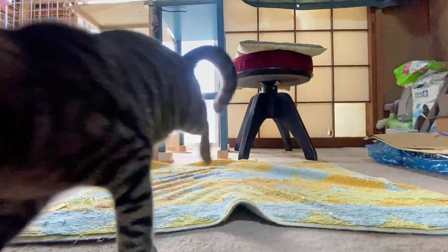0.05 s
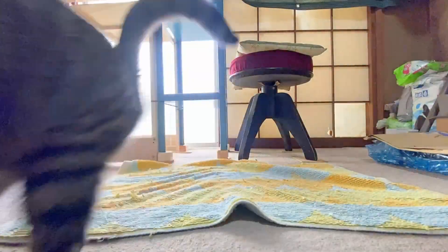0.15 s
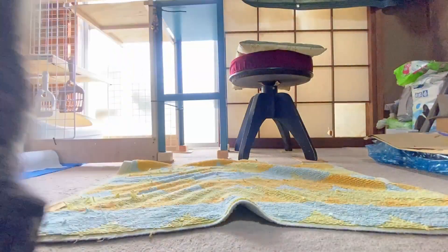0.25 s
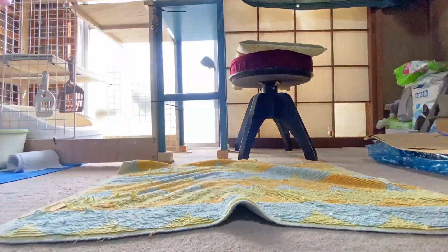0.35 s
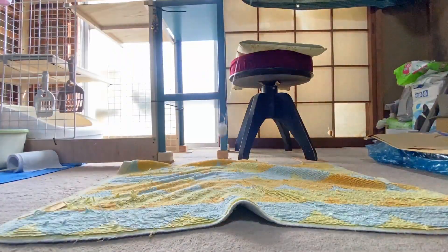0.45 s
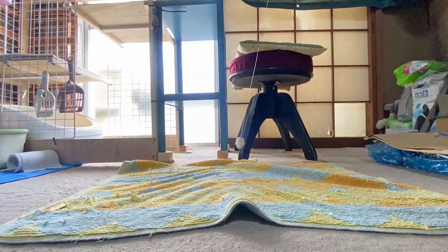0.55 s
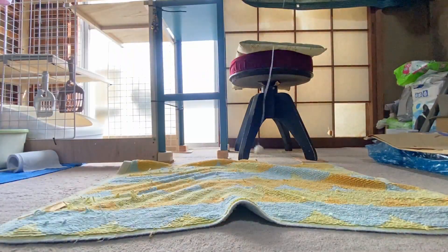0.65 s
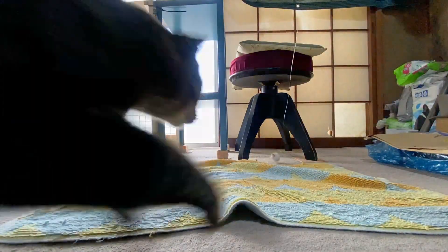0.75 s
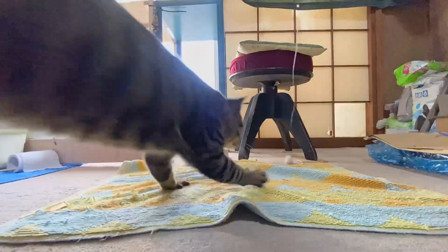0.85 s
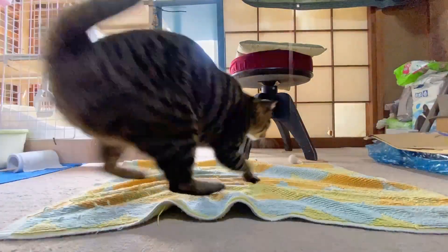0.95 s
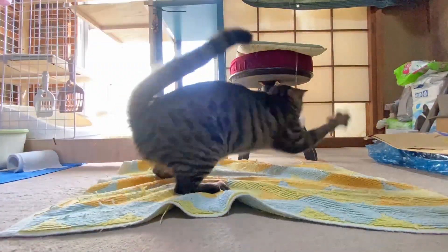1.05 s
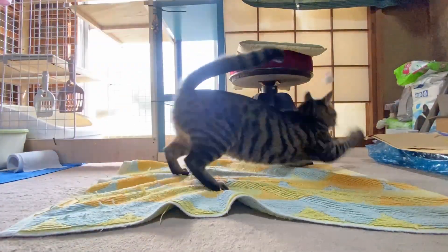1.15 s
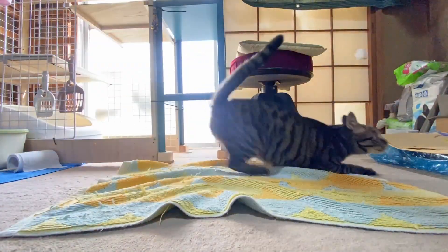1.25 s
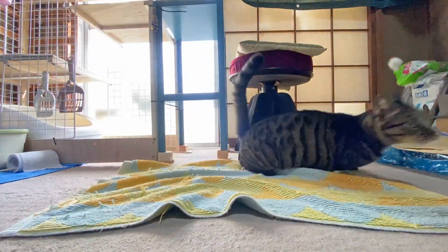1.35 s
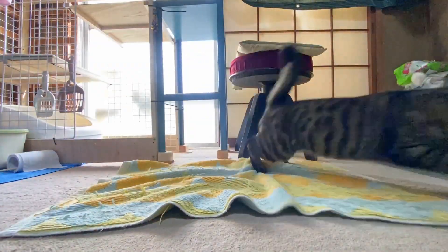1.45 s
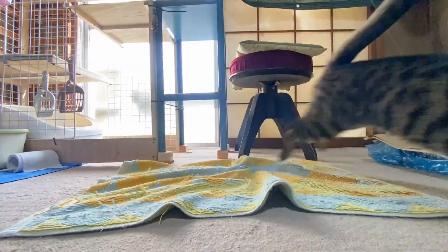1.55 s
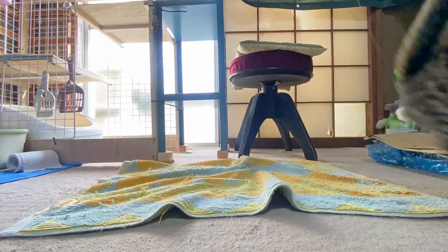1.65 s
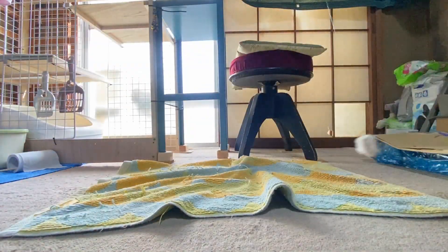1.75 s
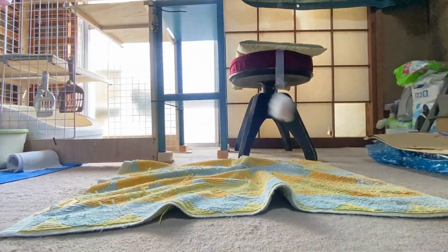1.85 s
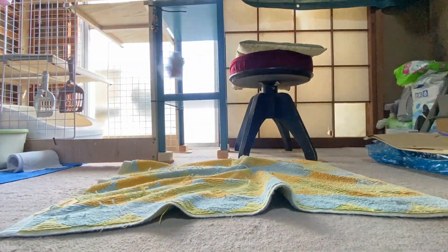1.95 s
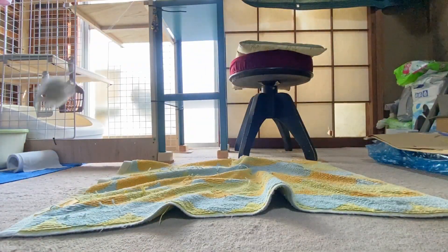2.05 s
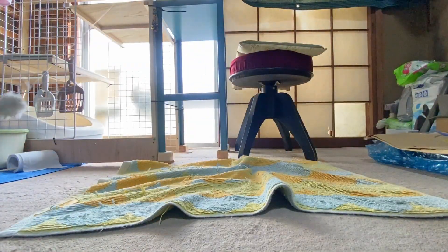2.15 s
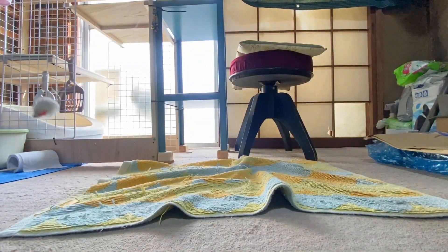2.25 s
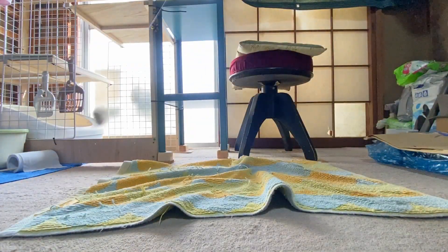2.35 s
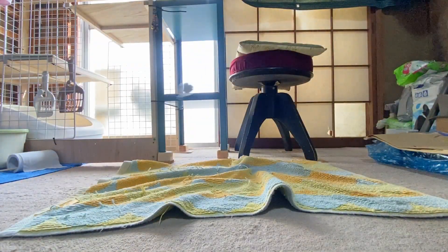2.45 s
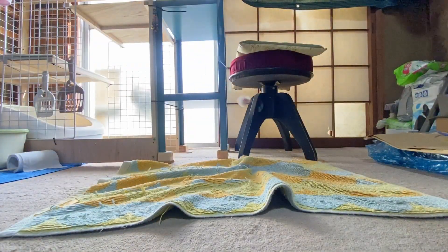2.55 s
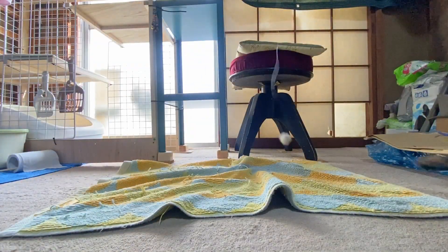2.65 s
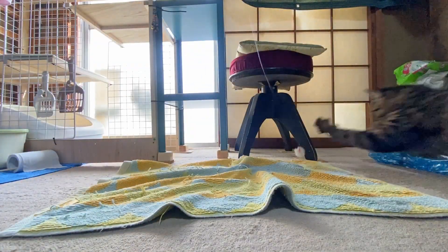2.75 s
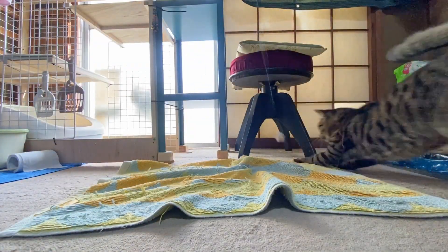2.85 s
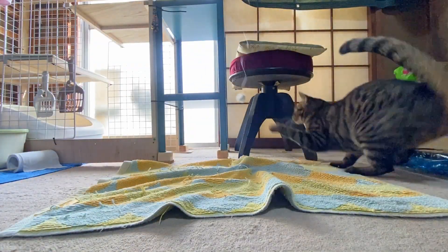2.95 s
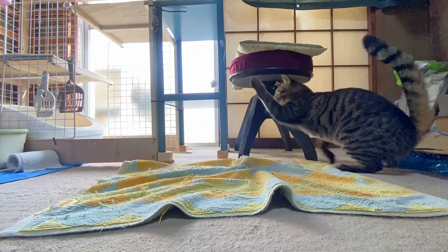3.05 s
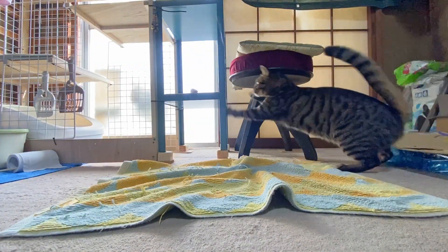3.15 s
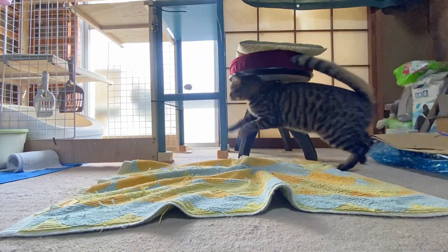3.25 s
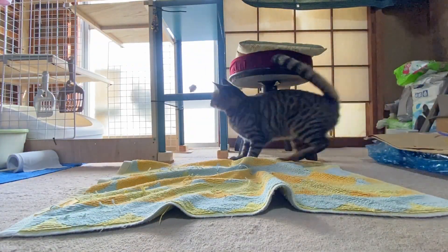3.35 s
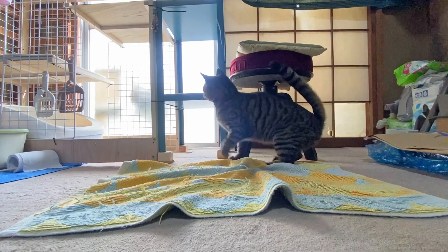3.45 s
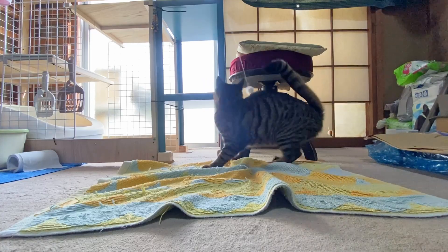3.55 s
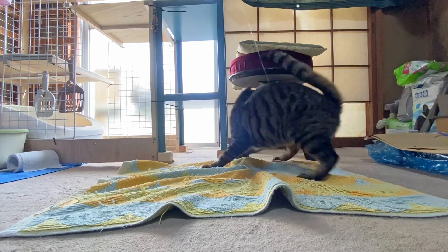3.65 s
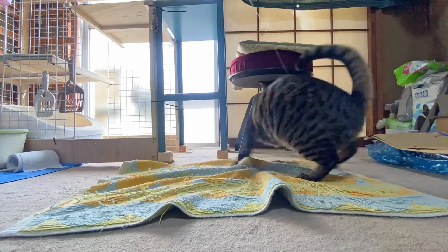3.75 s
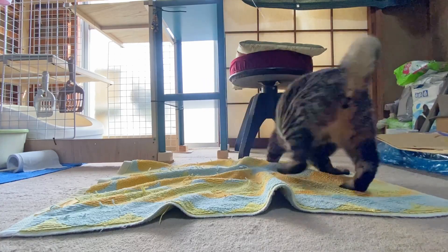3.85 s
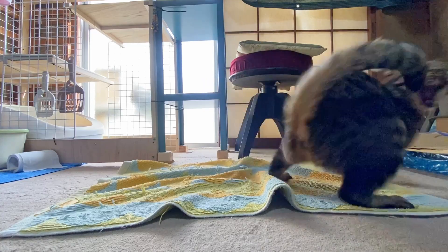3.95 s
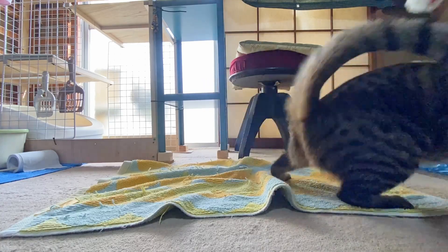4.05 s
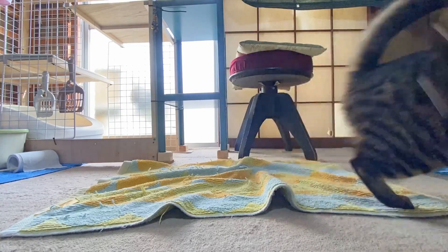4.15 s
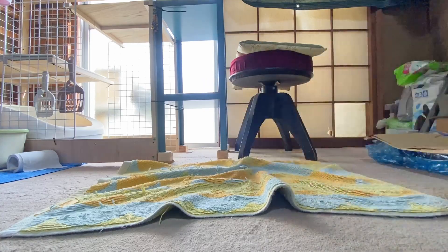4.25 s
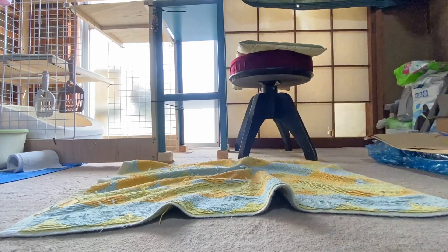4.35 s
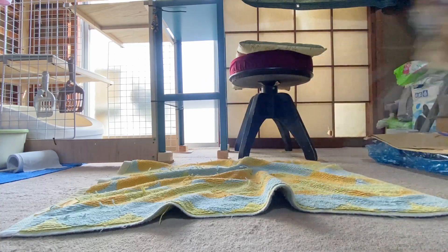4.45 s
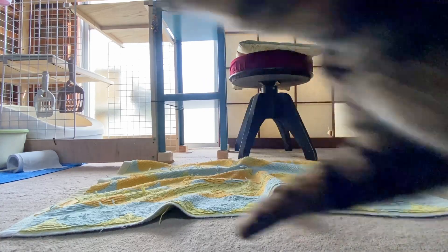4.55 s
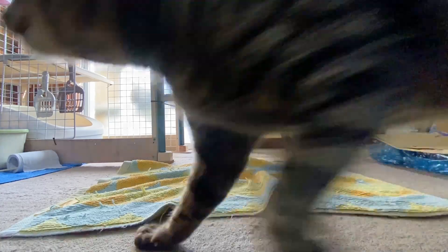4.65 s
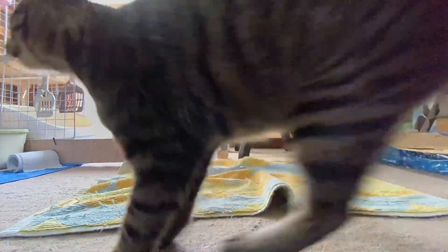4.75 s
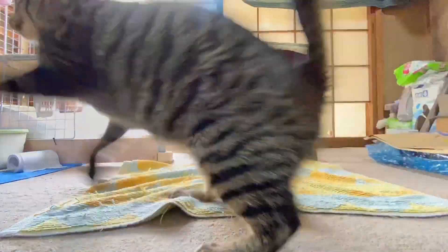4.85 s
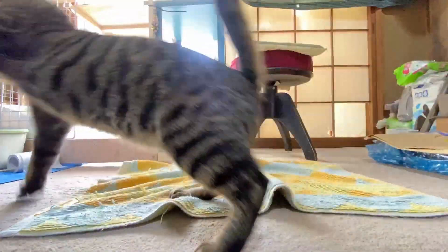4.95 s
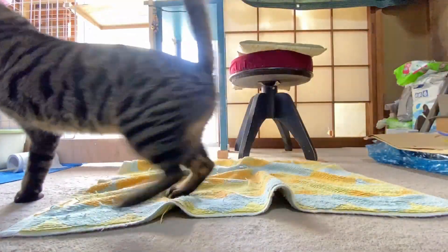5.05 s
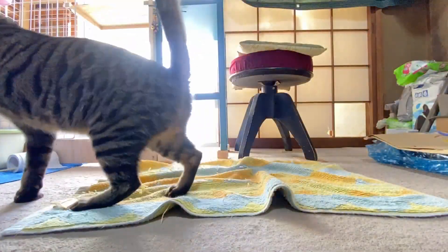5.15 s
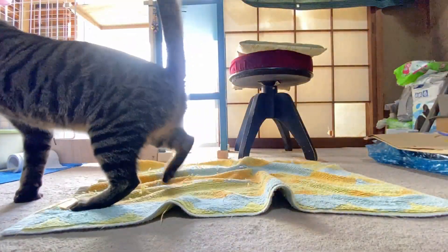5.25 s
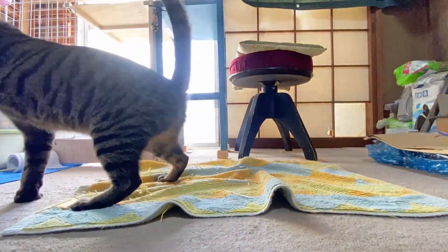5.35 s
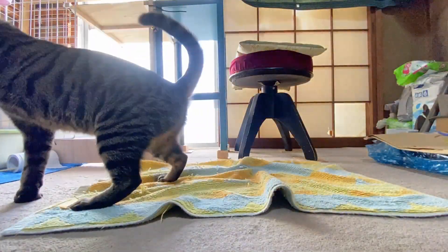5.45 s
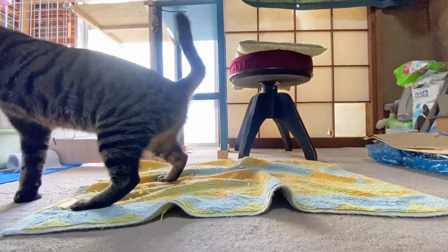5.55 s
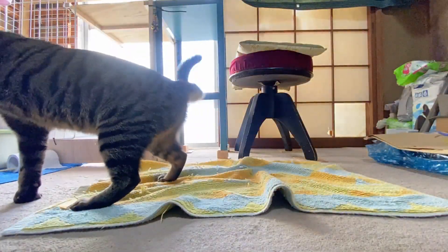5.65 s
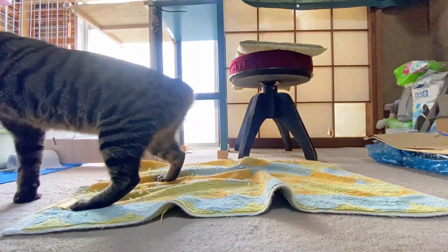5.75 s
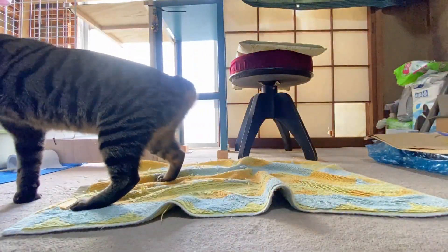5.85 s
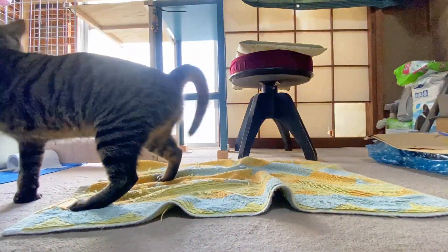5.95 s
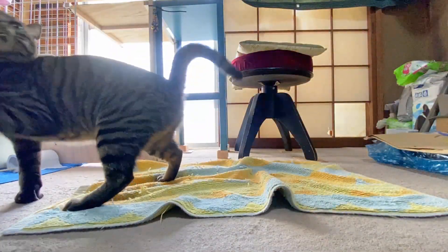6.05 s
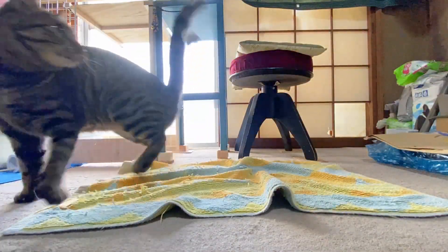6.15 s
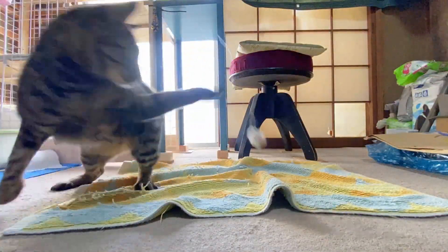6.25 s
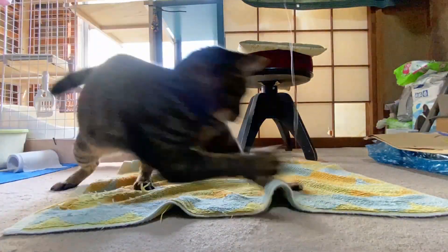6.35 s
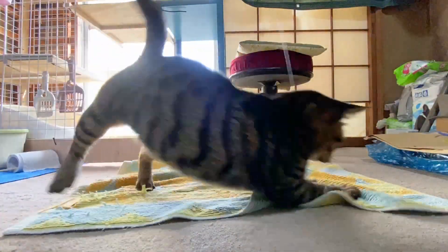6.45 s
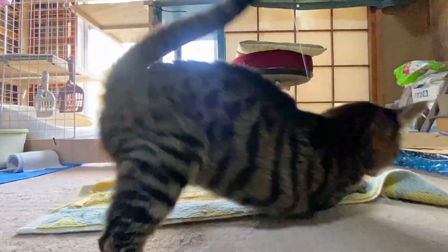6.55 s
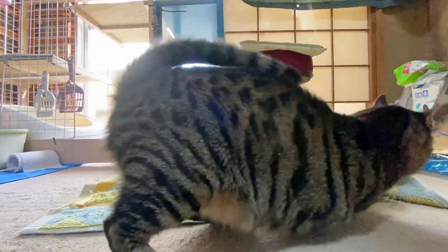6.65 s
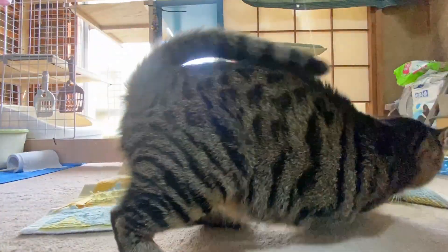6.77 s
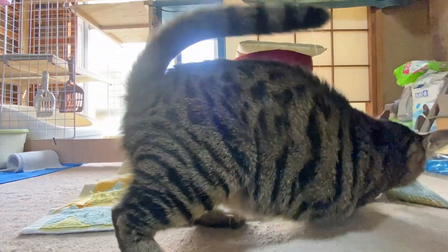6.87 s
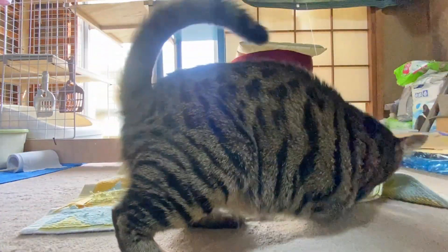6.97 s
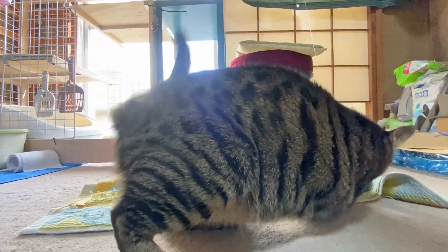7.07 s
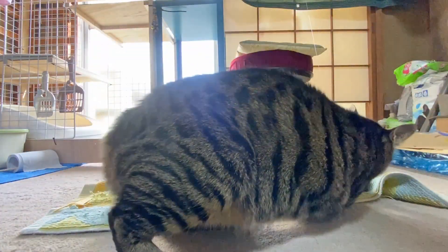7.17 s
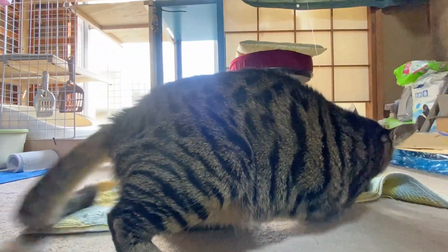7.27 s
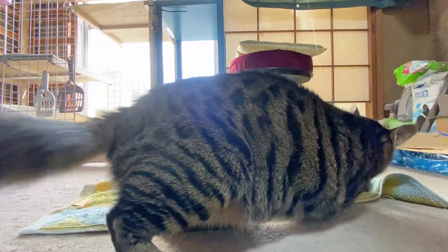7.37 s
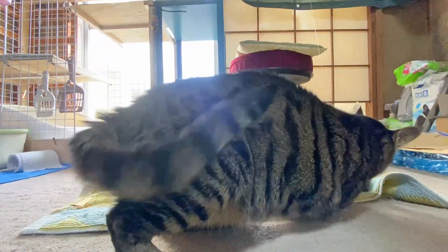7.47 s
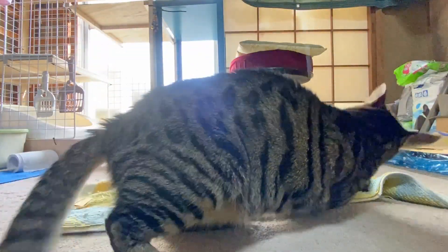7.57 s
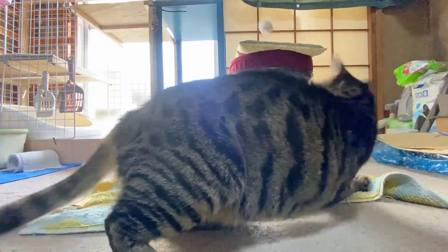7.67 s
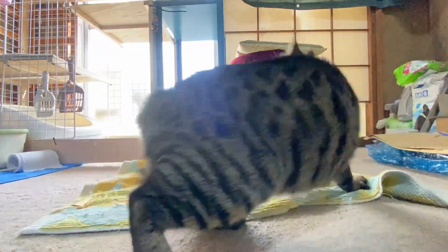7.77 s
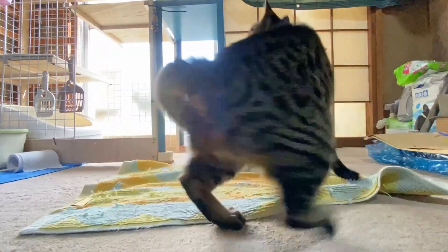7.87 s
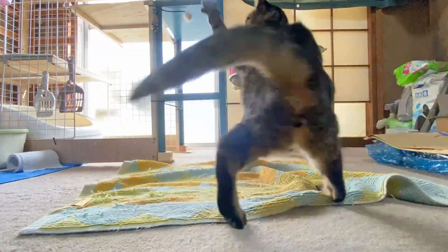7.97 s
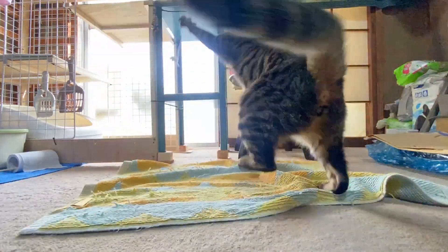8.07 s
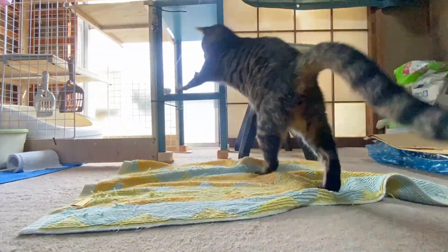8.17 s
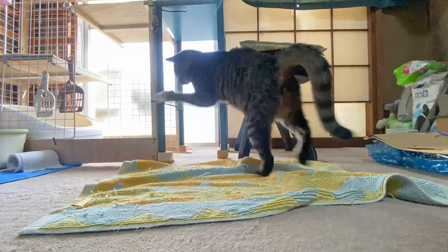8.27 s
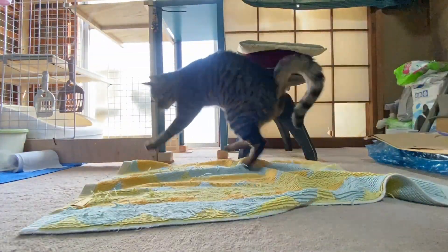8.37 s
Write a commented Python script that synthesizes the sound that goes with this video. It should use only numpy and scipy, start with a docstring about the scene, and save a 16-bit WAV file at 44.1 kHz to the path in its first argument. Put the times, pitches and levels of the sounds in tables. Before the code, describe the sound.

A microphone on the ground catches a cat bounding after a string toy. Soft paws pat the cloth while the wooden floor beneath answers with short, deep knocks. Terry cloth rustles and hisses, and claws pull free with tiny bright crackles. Bursts of running alternate with near-silent waits; a big double landing comes late, followed by stillness, a dull microphone rub, and a last flurry of scratchy swats.

```python
"""A carpeted wooden floor with a towel on it, microphone on the ground: a cat chases a toy on a string.
Paws: a soft chirped pat at each contact; under landings a knock and a hollow ring, spread into a falling chirp.
Towel: shaped noise for rub and hiss, short notes for flopping folds, bright dying crackle for snagged loops.
String: narrow-band air noise. Microphone: two brushes, each a low sway and a muffled rub.
Behind it: the room's reverberation, a low rumble and a faint hiss."""
import sys
import numpy as np
from scipy import signal
from scipy.fft import rfft, irfft, next_fast_len
from scipy.io import wavfile

SR = 44100
rng = np.random.default_rng(int(sys.argv[2]) if len(sys.argv) > 2 else 0)


def unload_audio(sound):
    """Save the sound as a 16-bit wav file, at the path given as the first command line argument."""
    columns = np.transpose(np.atleast_2d(sound))
    # keep every value between -1 and 1, then stretch to whole-number steps
    steps = np.round(np.clip(columns, -1, 1) * 32767)
    wavfile.write(sys.argv[1], SR, steps.astype(np.int16))


N = 370881
TIME_S = np.arange(N) / SR
AGE_S = np.arange(SR // 3) / SR   # since a contact

# Table levels are nominal: sources add their own trims. Pan > 0 is left.
# paws landing with weight: [t/s, thud level/dB, nominal board f/Hz, knock level/dB, pat level/dB,
# scuff level/dB, pan/dB]
FOOTFALLS = [(-.015, -25.5, 142.4, -48, -50, -70, -2), (0.031, -33, 140.5, -43, -50, -81, 4),
             (.173, -28.5, 139, -38, -29.5, -46, 5), (0.232, -37, 122, -48.5, -54, -78, 11),
             (0.266, -28.5, 156.7, -41.5, -36.5, -55, 3.5), (0.313, -35.5, 139, -50, -28, -49, 14),
             (0.446, -48.5, 142, -38.5, -30.5, -74, 5.5), (.492, -31.5, 143, -32, -27.5, -36.5, 5.5),
             (0.541, -37, 138, -43, -44, -58, 3.5), (0.678, -30.5, 147, -35.5, -23, -66, 9),
             (0.994, -32, 120.5, -52, -32, -78, -1), (1.163, -32, 184, -28, -26.5, -78, -1.5),
             (1.223, -33, 128, -33.5, -33.5, -79, -3.5), (1.288, -34, 123, -41, -28.5, -50.5, -3),
             (1.469, -39, 132, -62, -53, -72, -8), (1.566, -30.5, 137.5, -38, -39.5, -57.5, -8),
             (1.69, -38, 153, -51, -43.5, -62, -9), (1.742, -31, 127, -43.5, -46, -63, -11.5),
             (1.866, -51.5, 152, -52.5, -48.5, -76, -9), (2.589, -40, 122, -41.5, -26, -52.5, -5),
             (2.826, -29.5, 139, -27.5, -21, -65, -2.5), (2.849, -29, 147, -38, -35.5, -62, -1),
             (3.006, -42.5, 120, -46.5, -46, -84, -4.5), (3.332, -37.5, 158.5, -48, -37.5, -82, 0),
             (3.39, -44.5, 134, -45, -60, -81, -5), (3.555, -42, 171, -52.5, -42.5, -78, 3),
             (3.673, -41.5, 131, -43, -41.5, -83, 2.5), (3.804, -35, 141, -37, -36, -88, -1.5),
             (3.867, -45, 185, -45.5, -47, -85, -1.5), (3.965, -31, 119, -34, -31.5, -52.5, -2),
             (4.141, -26.5, 141, -31, -33, -54, -9), (4.234, -31, 124, -31.5, -24.5, -43, -7.5),
             (4.306, -41.5, 155, -48.5, -34.5, -50, -6), (4.455, -37, 149.3, -42.5, -41, -72, -10.5),
             (4.663, -44.5, 129, -61.5, -43.5, -73, 2), (4.756, -33.5, 147, -39, -24, -61, 6),
             (4.806, -29, 123, -51, -35, -56, -0.5), (4.868, -32, 128, -42, -39.5, -78, 1),
             (5.053, -41, 150, -37.5, -29.5, -52, 3.5), (5.35, -52, 135, -65.5, -59, -96, 1),
             (6.242, -35.5, 129, -42.5, -28, -84, 1.5), (6.326, -39.5, 140, -45.5, -38.5, -69, 0),
             (6.381, -30.5, 141, -43, -32, -57, -0.5), (6.435, -22.5, 131.6, -32.5, -27.5, -75, -3.5),
             (6.548, -20, 133.7, -30.5, -15, -36, 1.5), (6.623, -42, 132.3, -54, -34, -64, 2.5),
             (7.211, -48.5, 141, -59.5, -54.5, -91, 1.5), (7.602, -47, 150, -45.5, -45.5, -72, 6),
             (7.98, -32, 132.4, -48, -41, -72, -5.5), (8.234, -40, 147, -30.5, -25, -67, 1)]
# further floor modes: [f/Hz, level/dB relative to one another, t60/s]
FLOOR_MODES = [(65.4, -36.5, 0.39), (178, -19.5, 0.1), (261.4, -25, 0.35)]
# swipes that hit only the cloth: [t/s, pat level/dB, f/Hz, scuff level/dB, pan/dB]
SWATS = [(.508, -21, 714, -41, 3), (.519, -17, 667, -60, -2), (.648, -21.5, 750, -45.5, 4),
         (.67, -35, 860, -71, -0.5), (.71, -54, 895, -78, 1), (.979, -43, 970, -64, -3.5),
         (1.183, -29, 524, -83, -4), (1.343, -35, 700, -48.5, -2.5), (2.603, -36, 590, -45.5, 4.5),
         (2.684, -44, 740, -66.5, -4), (2.749, -52, 900, -67, -3), (2.824, -32, 840, -70, -0.5),
         (3.237, -42, 1190, -77, 1), (3.262, -48, 900, -80, 0.5), (4.397, -64, 840, -49, 2.5),
         (4.55, -58, 890, -70, 0), (5.066, -31.5, 664, -50, -3), (5.179, -47, 640, -60, 1),
         (5.51, -57, 754, -86, 2.5), (5.792, -37.5, 500, -50, 7), (5.83, -46, 626, -80.5, 1.5),
         (7.878, -34.5, 720, -57, -.5), (7.901, -25, 755, -71, -3), (8.018, -44, 676, -67, 2),
         (8.242, -31.5, 900, -67, 0), (8.349, -32, 361, -65, 2)]
# leg or flank strokes over the towel: [t/s at the fastest, rise/s, rub level/dB, hiss level/dB]
STROKES = [(.01, 0.013, -43, -56), (.09, 0.081, -56, -57.5), (.335, 0.062, -51, -57),
           (.495, 0.006, -39, -33), (.535, .04, -38, -44), (.66, 0.069, -50, -55), (.76, 0.02, -64, -62.5),
           (.915, 0.048, -46, -57.5), (1.03, 0.026, -47.5, -53), (1.24, 0.074, -50, -68.5),
           (1.33, 0.044, -37, -53), (1.485, 0.042, -44, -54.5), (1.62, 0.067, -62, -67.5),
           (1.78, 0.052, -56.5, -63.5), (2.2, 0.075, -75, -70.5), (2.545, .015, -47.5, -59),
           (2.605, 0.051, -54.5, -64), (2.77, 0.066, -55.5, -73.5), (2.995, 0.017, -49.5, -73),
           (3.06, 0.031, -45, -59), (3.18, 0.016, -48.5, -57), (3.26, 0.028, -51.5, -67),
           (3.35, 0.046, -48, -73), (3.405, 0.076, -57.5, -62.5), (3.82, 0.11, -58, -78),
           (3.98, .04, -53, -58), (4.07, 0.017, -84, -69), (4.255, 0.016, -57, -44.5),
           (4.32, 0.017, -50, -52.5), (4.385, 0.06, -46.5, -59.5), (4.59, 0.043, -68, -69),
           (4.775, 0.026, -41, -66), (5.075, 0.031, -40, -53), (5.17, 0.073, -56, -59.5),
           (5.67, 0.0095, -55, -62), (5.82, 0.032, -49, -62.5), (6.06, 0.38, -67.5, -71),
           (6.49, 0.049, -53, -49), (6.59, 0.05, -52, -54.5), (7.62, 0.02, -66, -66),
           (7.885, 0.033, -46, -57), (8.08, 0.28, -81, -63.5), (8.245, 0.029, -34.5, -50.5),
           (8.37, 0.071, -45.5, -61)]
# bearing of the cat: [t/s, pan/dB]
BEARING = [(0, 1), (.6, 7.5), (1.1, 1), (2.6, -2.5), (4.2, 3), (4.7, 2), (5.8, 5.5), (6.3, 1.5), (8.3, 0.5)]
# claws plucking towel loops: [t/s, level/dB, t60/s]
SNAGS = [(0.096, -54, 0.073), (0.484, -53, 0.25), (0.63, -58, 0.025), (1.01, -63, 0.037),
         (1.115, -65.5, 0.12), (2.829, -46, .26), (2.858, -62, 0.13), (3.021, -66, 0.2),
         (3.153, -45.5, 0.12), (3.36, -58, 0.48), (3.897, -58.5, 0.66), (4.754, -70, 0.046),
         (5.041, -45.5, .32), (5.178, -55.5, .17), (5.222, -64, 0.12), (5.658, -73, 0.079),
         (5.793, -59, 0.25), (6.782, -65.5, 0.18), (8.146, -53.5, 0.24), (8.202, -41.5, 0.065),
         (8.288, -53.5, 0.27), (8.385, -52.5, 0.26)]
# string whipping through the air: [t/s, half length/s, f/Hz, level/dB]
SWISHES = [(2.206, 0.061, 6900, -75), (3.933, 0.021, 4300, -66), (4.066, 0.018, 7450, -63)]
# cat brushing the microphone: [t/s, half length/s, air push level/dB, muffled rub level/dB]
BRUSHES = [(0.275, 0.015, -37, -34), (7.473, 0.024, -23.5, -21.5)]

# spectrum of the coarse rub: [f/Hz, relative density/dB]
RUB_SPECTRUM = [(150, 16.5), (350, 9), (700, -0.5), (1300, 3), (2300, -5.5), (3500, -18.5), (6000, -33)]
# spectrum of the fine cloth hiss: [f/Hz, relative density/dB]
HISS_SPECTRUM = [(1500, 7), (2800, 6.5), (4800, 4), (7500, 0), (10000, -5.5), (12000, -3.5), (16000, -21.5)]
# spectrum of the scuff under a pad: [f/Hz, relative density/dB]
SCUFF_SPECTRUM = [(800, -12), (1300, 2), (1700, 4), (2250, 6.5), (3100, 0), (5000, -4.5), (8000, -5),
                  (16000, -34.5)]
# spectrum of a torn-free loop: [f/Hz, relative density/dB]
SNAG_SPECTRUM = [(1500, -16.5), (3500, -5.5), (7000, -5.5), (11000, -1), (15000, -2)]
# spectrum of the still room: [f/Hz, relative density/dB]
QUIET_SPECTRUM = [(20, -34), (35, -11.5), (60, 5.5), (130, -5), (300, -11), (416, -15.5), (695, -28.5),
                  (1500, -35.5), (3080, -45), (7300, -46), (16000, -59.5)]
# spectrum of the muffled rub on the microphone: [f/Hz, relative density/dB]
BRUSH_SPECTRUM = [(30, -7), (120, 2.5), (230, -4.5), (450, -4.5), (900, -24.0), (1500, -59.5), (3000, -85)]
# fading rumble: [t/s, level/dB]
RUMBLE = [(0, -46), (1.9, -53.5), (6.7, -58.5), (7.7, -62.5), (8.1, -70)]

# pitch of a landing's pat: harder sounds higher
PAT_HZ, PAT_AT_DB, PAT_OCTAVES_PER_DB = 537, -32, .018
# the softer the knock against the thud, the later the boards are loaded
LOAD_S, LOAD_S_PER_DB, LOAD_MAX_S = -.0035, .00038, 0.003
# slide after each landing; levels relative to its table pat level
SLIDE_AFTER_S, SLIDE_RISE_S, SLIDE_RUB_DB, SLIDE_HISS_DB = .022, 0.019, -16.5, -49.5
STROKE_EXPONENT, STROKE_FALL_PER_RISE = 1.23, 0.86
ECHO_MIN_MS, ECHO_MAX_MS = 1.3, 13
ROOM_T60_S, WALL_CUT_HZ, ROOM_DB = 0.35, 1600, -26.5
QUIET_DB = -58
CUTOFF_HZ = 16000


def from_db(db):
    """Decibels to gain."""
    return 10 ** (np.asarray(db) / 20)


def rms_one(x):
    """Scale to rms 1."""
    return x / np.sqrt(np.mean(x ** 2) + 1e-20)


def burst_one(x, seconds):
    """Scale a short sound to the energy of rms 1 held for so many seconds."""
    return x / np.sqrt(np.mean(x ** 2) * x.shape[-1] / SR / seconds + 1e-20)


def in_time(rows):
    """Interpolate each column of a time table at every sample."""
    t_s, *columns = np.transpose(rows)
    return [np.interp(TIME_S, t_s, column) for column in columns]


def band(x, low_hz, high_hz, order=2):
    """Butterworth band-pass."""
    edges_hz = [low_hz, min(high_hz, .45 * SR)]
    return signal.sosfilt(signal.butter(order, edges_hz, "band", fs=SR, output="sos"), x)


def colour(x, spectrum):
    """Filter noise to a spectrum, interpolated over log frequency."""
    hz, db = np.transpose(spectrum)
    size = next_fast_len(x.shape[-1] + len(AGE_S) // 2)
    grid_hz = np.maximum(np.arange(size // 2 + 1) * SR / size, 1)
    gain = from_db(np.interp(np.log(grid_hz), np.log(hz), db))
    return irfft(rfft(x, size) * gain, size)[..., :x.shape[-1]]


def ring(x, hz, t60_s):
    """Two-pole resonator: a unit click starts a dying sine of height 1."""
    radius, angle = from_db(-60 / (t60_s * SR)), 2 * np.pi * hz / SR
    feedback = [1, -2 * radius * np.cos(angle), radius * radius]
    return signal.lfilter([0, np.sin(angle)], feedback, x + 1e-18)


def drift(knots_per_s):
    """Random line through normal knots of spread 1."""
    knots = rng.standard_normal(4096)
    return np.interp(TIME_S * knots_per_s, np.arange(len(knots)), knots)


def grains(size, spread_db, alike):
    """Stereo noise of fibre slips of uneven strength, partly shared by both channels."""
    white, alike = rng.standard_normal((3, size)), np.clip(alike, 0, 1)
    steps = np.clip(rng.standard_normal(size // 16 + 1), -2.5, 2.5)
    strength = from_db(spread_db * steps)[np.arange(size) // 16]   # held for 16 samples
    return (np.sqrt(alike) * white[0] + np.sqrt(1 - alike) * white[1:]) * strength


def place(x, pan_db, lag_ms):
    """The nearer channel is louder and hears the sound earlier."""
    x = np.broadcast_to(x, (2, x.shape[-1]))
    at = np.arange(x.shape[-1])
    lead = lag_ms * SR / 2000 * np.tanh(pan_db / 2)   # samples, half the lag each way
    left, right = from_db(pan_db / 2), from_db(-pan_db / 2)
    pair = np.array([left * np.interp(at + lead, at, x[0]), right * np.interp(at - lead, at, x[1])])
    return pair / np.sqrt((left ** 2 + right ** 2) / 2)


def add(out, t_s, sound):
    """Mix a stereo sound in at a time."""
    start = int(round(t_s * SR))
    first, last = max(start, 0), min(start + sound.shape[1], N)
    out[:, first:last] += sound[:, first - start:last - start]


def scattered(x, echo_gain, count):
    """Board edges and furniture legs return early echoes, drawn afresh per call; stereo out."""
    out = np.broadcast_to(x, (2, x.shape[-1])).copy()
    direct = out.copy()
    for delay_ms in rng.uniform(ECHO_MIN_MS, ECHO_MAX_MS, count):
        lag = int(delay_ms * SR / 1000) + 1
        gains = echo_gain * (rng.choice([-1, 1]) + 0.71 * rng.standard_normal((2, 1)))
        out[:, lag:] += gains * direct[:, :-lag]
    return out


def bending_wave(corner_hz, count):
    """Allpass chain for board dispersion: high notes travel faster, so a click becomes a falling chirp."""
    wave, pole = signal.unit_impulse(len(AGE_S)), np.exp(-2 * np.pi * corner_hz / SR)
    for _ in range(count):
        wave = signal.lfilter([-pole, 1], [1, -pole], wave + 1e-18)
    return wave


def thuds(board_t60_s=0.087, cushion_t60_s=0.045, thud_db=-2.5, knock_db=0.0):
    """Under each footfall a ragged knock and the low ring of the boards, whose pitch depends on the spot."""
    out, wave = np.zeros((2, N)), bending_wave(corner_hz=277, count=12)
    modes = sum(from_db(db) * ring(band(wave, 44, 210), hz, t60_s) for hz, db, t60_s in FLOOR_MODES)
    push = band(band(wave, 210.0, 452), 190, 440)
    for t_s, level_db, hz, hard_db, _, _, pan_db in FOOTFALLS:
        cushioned = ring(wave, hz * 1.252, cushion_t60_s)
        boom = burst_one(ring(cushioned, hz * 0.942, board_t60_s), 0.066)
        knock = burst_one(scattered(push, .5, count=4), .025)
        sound = from_db(level_db + thud_db) * (boom + 2 * modes) + from_db(hard_db + knock_db) * knock
        load_s = min(LOAD_S + LOAD_S_PER_DB * (level_db - hard_db), LOAD_MAX_S)
        add(out, t_s + load_s, place(sound, pan_db, lag_ms=0.94))
    return out


def pats(pan_share=0.65):
    """Every footfall and swat begins with the pad meeting the cloth."""
    out, wave = np.zeros((2, N)), bending_wave(corner_hz=700, count=8)
    contacts = []
    for t_s, _, _, _, pat_db, scuff_db, pan_db in FOOTFALLS:
        hz = PAT_HZ * 2 ** (PAT_OCTAVES_PER_DB * (pat_db - PAT_AT_DB))
        contacts.append((t_s, pat_db, hz, scuff_db, pan_share * pan_db))
    for t_s, pat_db, hz, scuff_db, pan_db in contacts + list(SWATS):
        add(out, t_s - .0008, place(pat(wave, pat_db, hz, scuff_db), pan_db, lag_ms=0.44))
    return out


def pat(wave, level_db, hz, bright_db, crush_t60_s=0.035, scuff_t60_s=0.047, width=1.215, pat_db=-8.0,
        scuff_db=0.0, crush_share=0.59, echo_gain=0.26, scuff_rise_s=0.00028):
    """The pad's push chirps through the floor while the pile is crushed under it with a short scuff."""
    pile = grains(len(AGE_S), spread_db=3, alike=.8) * from_db(-60 * AGE_S / crush_t60_s)
    push = rms_one(band(wave, hz / width, hz * width))
    crush = rms_one(band(pile, hz / width, 2 * hz * width))
    pad = burst_one(scattered(push + crush_share * crush, echo_gain, count=4), .014)
    fibres = colour(grains(len(AGE_S), spread_db=5.5, alike=1.0), SCUFF_SPECTRUM)
    swell = from_db(-60 * AGE_S / scuff_t60_s) * (1 - np.exp(-AGE_S / scuff_rise_s))
    scuff = burst_one(scattered(fibres * swell, .3, count=3), .013)
    return from_db(level_db + pat_db) * pad + from_db(bright_db + scuff_db) * scuff


def rubbing(rub_db=-4.5, fold_db=-2.5, hiss_db=0.0, catch_db=3.0):
    """Sliding over terry cloth: coarse rub, flopping folds and fine hiss, catching and slipping together."""
    rub_gain, hiss_gain = sliding()
    pan_db, = in_time(BEARING)
    catch = catch_db * drift(140)   # dB; the hiss follows by half
    pile = from_db(rub_db) * rms_one(colour(grains(N, spread_db=2.0, alike=0.39), RUB_SPECTRUM))
    rub = rub_gain * from_db(catch) * (pile + from_db(fold_db) * folds(per_s=600, cycles=3.4))
    fibres = rms_one(colour(grains(N, spread_db=4.0, alike=0.15), HISS_SPECTRUM))
    hiss = hiss_gain * from_db(hiss_db + catch / 2) * fibres
    cloth = scattered(band(rub + hiss, 130, 19000), .22, count=3)
    return place(cloth, pan_db, lag_ms=.38)


def sliding():
    """Rub and hiss gains over time: strokes and post-landing slides swell and fade, summed in power."""
    power = np.zeros((2, N))
    slides = [(t_s + SLIDE_AFTER_S, SLIDE_RISE_S, pat_db + SLIDE_RUB_DB, pat_db + SLIDE_HISS_DB)
              for t_s, _, _, _, pat_db, _, _ in FOOTFALLS]
    for t_s, rise_s, rub_db, hiss_db in list(STROKES) + slides:
        since_s = np.arange(-4 * rise_s, 4 * rise_s, 1 / SR)
        reach_s = rise_s * np.where(since_s < 0, 1, STROKE_FALL_PER_RISE)
        swell = np.exp(-np.abs(since_s / reach_s) ** STROKE_EXPONENT)
        add(power, t_s + since_s[0], (from_db([[rub_db], [hiss_db]]) * swell) ** 2)
    return np.sqrt(power)


def folds(per_s, cycles):
    """Folds of cloth flop over at random, each a short dull note; rms 1."""
    pitches_hz = np.geomspace(380, 2400, 12)
    flops = (rng.random(N) < per_s / SR) * rng.uniform(-0.69, 1, N)
    dealt = rng.integers(0, len(pitches_hz), N)
    notes = (ring(flops * (dealt == k), hz, cycles / hz) / hz ** 1.2 for k, hz in enumerate(pitches_hz))
    return rms_one(sum(notes))


def snags(snag_db=-1.0, rise_s=0.0029, pan_db=1.7):
    """A claw tears free of the loops in a bright, dying crackle."""
    out = np.zeros((2, N))
    for t_s, level_db, t60_s in SNAGS:
        loops = grains(len(AGE_S), spread_db=5.5, alike=.8)
        swell = (1 - np.exp(-AGE_S / rise_s)) * from_db(-60 * AGE_S / t60_s)
        crackle = burst_one(colour(loops * swell, SNAG_SPECTRUM), 0.065)
        add(out, t_s, place(from_db(level_db + snag_db) * crackle, pan_db, lag_ms=0.21))
    return out


def swishes(width=1.12):
    """Air sheds off the swinging string in a narrow, airy note."""
    air = grains(N, spread_db=1, alike=0.16)
    out = np.zeros((2, N))
    for t_s, half_s, hz, level_db in SWISHES:
        swell = np.exp(-((TIME_S - t_s) / half_s) ** 2)
        out += from_db(level_db) * swell * rms_one(band(air, hz / width, hz * width))
    return out


def brushes(sway_hz=48, sway_lead_s=0.03):
    """The microphone sways just ahead of a muffled rub, largely in opposite phase in the two channels."""
    out = np.zeros((2, N))
    rub = rms_one(colour(grains(N, spread_db=5.5, alike=0.93), BRUSH_SPECTRUM))
    for t_s, half_s, air_db, rub_db in BRUSHES:
        since_s = TIME_S - t_s + sway_lead_s
        sway = np.exp(-(since_s / half_s / 0.74) ** 2) * np.sin(2 * np.pi * sway_hz * since_s)
        stroke = rub * np.exp(-((TIME_S - t_s) / half_s) ** 4)
        out += from_db(air_db) * burst_one(sway, half_s * 2) * np.array([[1], [-.4]])
        out += from_db(rub_db) * burst_one(stroke, half_s * 2) * np.array([[1], [-.7]])
    return out


def room(x):
    """Reverberation: eight feedback delays a side, duller on every round."""
    out, pole = np.zeros((2, N)), np.exp(-2 * np.pi * WALL_CUT_HZ / SR)
    lags = (np.geomspace(.011, .041, 16) * rng.uniform(.96, 1.04, 16) * SR).astype(int)
    for k, lag in enumerate(lags):
        side = k % 2
        loop, state = x[side].copy(), [0.]
        gain = from_db(-60 * lag / SR / ROOM_T60_S)
        for i in range(lag, N, lag):
            back, state = signal.lfilter([gain * (1 - pole)], [1, -pole], loop[i - lag:i], zi=state)
            loop[i:i + lag] += back[:N - i]
        out[side] += (loop - x[side]) * (-1) ** (k // 2)
    return out


def background():
    """Still room: a narrow low rumble that fades, under faint, wide noise."""
    air = from_db(QUIET_DB) * rms_one(colour(grains(N, spread_db=1.0, alike=0.44), QUIET_SPECTRUM))
    rumble_db, = in_time(RUMBLE)
    rumble = rms_one(band(grains(N, spread_db=2.0, alike=.85), 52.0, 64))
    return air + from_db(rumble_db) * rumble


def scene(fade_s=0.00266):
    """The cat's play with its reverberation, the brushes and the still room, faded in."""
    play = thuds() + pats() + snags() + rubbing() + swishes()
    whole = play + from_db(ROOM_DB) * room(play) + brushes() + background()
    return whole * np.minimum(TIME_S / fade_s, 1)


def record(dry, top=0.71):
    """Microphone: deepest bass lost, loud peaks rounded, a dip in the top octave, the very top cut."""
    thinned = signal.sosfilt(signal.butter(2, 32, "high", fs=SR, output="sos"), dry)
    rounded = top * np.tanh(thinned / top)
    dipped = signal.lfilter(*signal.iirnotch(13300, 9, fs=SR), rounded)
    return signal.sosfilt(signal.ellip(10, .3, 80, CUTOFF_HZ, fs=SR, output="sos"), dipped)


dry = scene()
out = record(dry)
unload_audio(out)
```